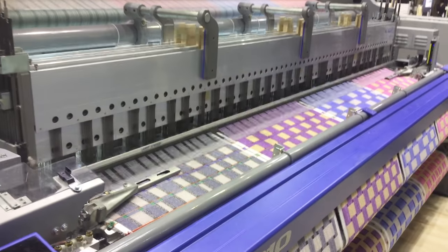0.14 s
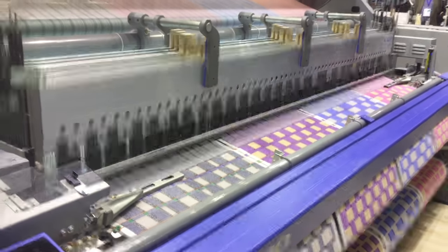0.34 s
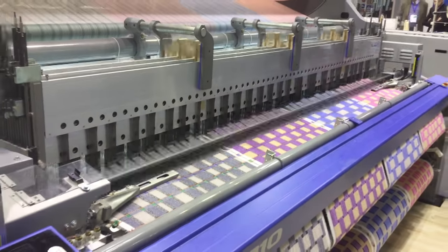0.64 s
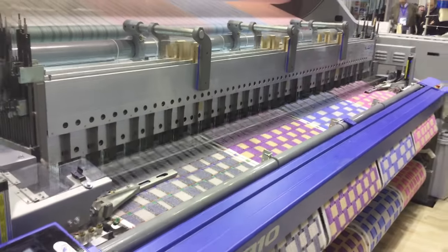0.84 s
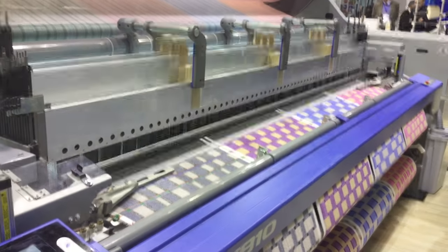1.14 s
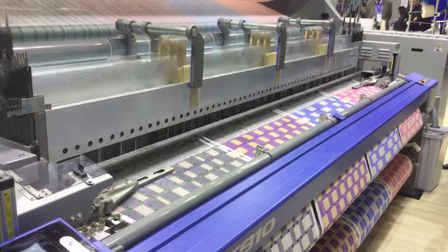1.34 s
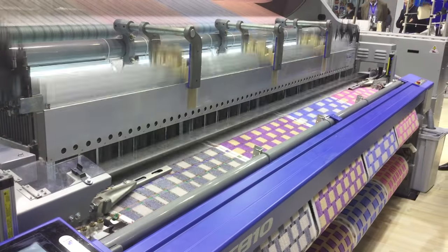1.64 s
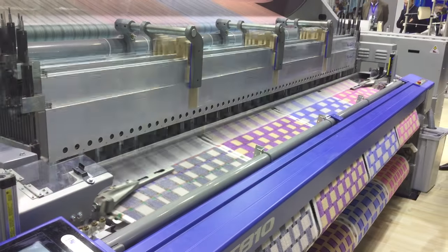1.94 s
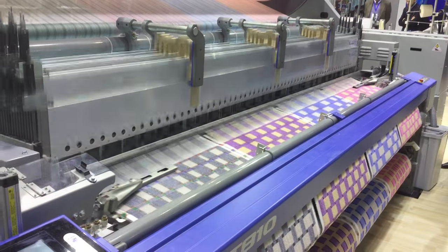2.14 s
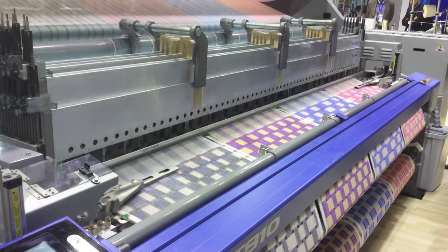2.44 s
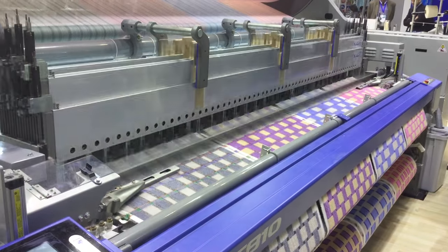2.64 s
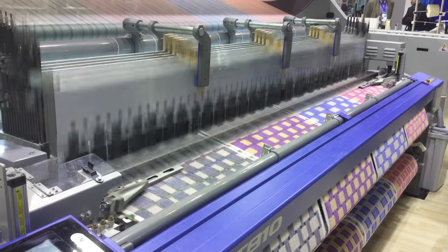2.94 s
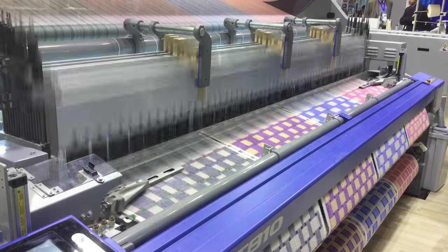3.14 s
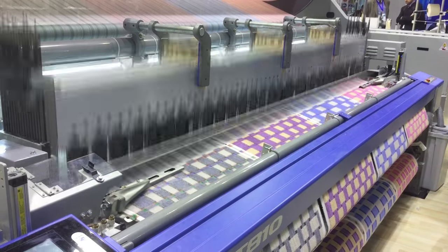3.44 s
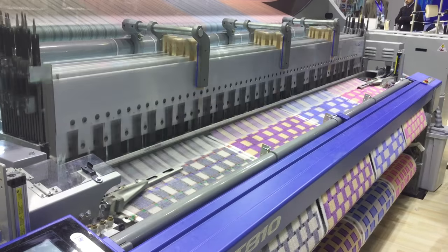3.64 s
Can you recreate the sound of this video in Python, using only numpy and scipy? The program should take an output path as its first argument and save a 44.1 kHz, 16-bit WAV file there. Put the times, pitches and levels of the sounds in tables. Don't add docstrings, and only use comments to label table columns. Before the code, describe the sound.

Air-jet weaving loom pounding in hissing, thudding bursts, first slower, then pausing, then running fast

```python
import sys
import numpy as np
from scipy import signal
from scipy.io import wavfile
from scipy.ndimage import uniform_filter1d

SR = 44100
rng = np.random.default_rng(int(sys.argv[2]) if len(sys.argv) > 2 else 0)


def transcribe(signal):
    frames = np.atleast_2d(signal).T
    limited = np.clip(frames, -1, 1)
    pcm = np.round(limited * 32767).astype(np.int16)
    wavfile.write(sys.argv[1], SR, pcm)


def natural_amplitude(level_db):
    exponent = np.asarray(level_db, float) / 20
    return 10 ** exponent


N = 167580

# valve opens in seconds, open for in seconds, hiss in dB, buffeting in dB.
SLOW_PICKS = [(-0.038, 0.071, -18, -7), (0.056, 0.064, -17.5, -9), (0.15, 0.058, -17.0, -10),
              (0.24, 0.06, -17, -11.5), (0.333, 0.058, -17, -12.5), (0.426, 0.057, -17.7, -12),
              (0.517, 0.052, -17.5, -11.5), (0.606, 0.062, -18.5, -12.5), (0.697, 0.064, -17, -11),
              (0.791, 0.055, -16.5, -9.5), (0.882, 0.06, -17.8, -10), (0.974, 0.061, -18, -12.5),
              (1.064, 0.065, -16.5, -9), (1.155, 0.073, -18.5, -14), (1.429, 0.07, -15.6, -11.5),
              (1.704, 0.069, -16, -11.5), (1.801, 0.048, -16, -7.5)]
# valve opens in seconds, open for in seconds, hiss in dB, buffeting in dB.
FAST_PICKS = [(1.888, 0.051, -17.5, -11), (1.964, 0.043, -18, -10.8), (2.036, 0.047, -16, -11),
              (2.111, 0.054, -18.5, -11), (2.184, 0.057, -18.5, -10), (2.259, 0.047, -17.8, -11),
              (2.335, 0.047, -16.5, -6.5), (2.408, 0.053, -18, -12), (2.485, 0.043, -16.6, -11.5),
              (2.558, 0.057, -18, -12.5), (2.633, 0.041, -17.5, -9.5), (2.707, 0.046, -17.5, -11.0),
              (2.783, 0.05, -17.0, -10.5), (2.858, 0.045, -17, -8.9), (2.93, 0.05, -18.5, -10.5),
              (3.005, 0.056, -18.5, -12.5), (3.081, 0.05, -18.0, -10.4), (3.154, 0.051, -18.5, -10),
              (3.228, 0.043, -18, -11), (3.303, 0.05, -18.5, -10.6), (3.378, 0.047, -18, -10),
              (3.452, 0.057, -19.5, -12), (3.527, 0.046, -17, -12.5), (3.602, 0.049, -18.5, -11.5),
              (3.676, 0.05, -17, -10.9), (3.75, 0.042, -17, -9)]
# frequency in Hz, density in dB per Hz.
HISS_SPECTRUM = [(300, -8), (700, -3.5), (1400, 0), (2500, -1.5), (4500, -1), (9300, -1.5), (12000, -23),
                 (15100, 12)]
# frequency in Hz, density in dB per Hz.
GUST_SPECTRUM = [(25, -42), (55, -0.5), (100, 1.5), (300, -3.5), (500, -13), (1200, -16.5), (2500, -23),
                 (6000, -41)]
# time in seconds, extra roar in dB.
STREAM_AIM = [
    (0, -9.5),
    (.45, 4.5),
    (.7, 1),
    (.95, -4.5),
    (1.5, -10),
    (1.75, -5),
    (1.9, 4.5),
    (2.4, 1.5),
    (3.0, 3),
    (3.8, 5.5),
]
# lag in seconds, stretch in time as a ratio.
FRONT_PACES = [
    (.0205, 1.35),
    (.0008, 1),
]
# time in seconds, level in dB.
CLATTER_LEVEL = [
    (0, -32),
    (1.2, -42),
    (1.75, -36),
    (1.95, -22.5),
    (3.8, -25),
]
# frequency in Hz, density in dB per Hz.
DRONE_SPECTRUM = [(15, -62), (25, -9), (101, -7), (327, -16), (1770, -22), (2250, -26), (11500, -39),
                  (15100, -47)]
# frequency in Hz, width in Hz, level in dB.
MOTOR_TONES = [(100, 18, -33), (210, 15.4, -28.5), (588, 16, -33.5), (739, 7.2, -42), (1214, 130, -34),
               (1800, 15, -74)]

PACES = (SLOW_PICKS, FAST_PICKS)


def rms_one(x):
    return x / np.sqrt(np.mean(x ** 2) + 1e-20)


def drift(rate_hz):
    step = 40
    r = np.exp(-2 * np.pi * rate_hz * step / SR)
    slow = signal.lfilter([1], [1, -2 * r, r * r], rng.standard_normal(N // step + 2002))
    slow = rms_one(slow[2000:])
    return np.interp(np.arange(N) / step, np.arange(len(slow)), slow)


def over_time(table):
    return np.interp(np.arange(N) / SR, *np.transpose(table))


def butter_pass(x, order, hz, kind):
    return signal.sosfilt(signal.butter(order, hz, kind, fs=SR, output="sos"), x)


def resonance(x, hz, width_hz):
    r = np.exp(-np.pi * width_hz / SR)
    zeros = np.array([1, 0, -1]) * (1 - r * r) / 2
    poles = [1, -2 * r * np.cos(2 * np.pi * hz / SR), r * r]
    return signal.lfilter(zeros, poles, x)


def colour(sources, spectrum, patchy_db, patch_hz):
    edges = 22 * 2 ** np.arange(0, 10, .5)
    hz, db = np.transpose(spectrum)
    out = 0
    for k, (low, high) in enumerate(zip(edges[:-1], edges[1:])):
        band = butter_pass(sources[k % 2], 2, [low, high], "band")
        level = np.interp(np.log(low * high) / 2, np.log(hz), db)
        out = out + natural_amplitude(level + patchy_db * drift(patch_hz)) * band
    return rms_one(out)


def valve(column, lag, opening, closing, lead_db, shapes):
    lead_times = 0.0067, 0.032
    after_times = 0.041, 0.02
    t = np.arange(N) / SR
    out = np.zeros(N)
    for rows, lead_s, after_s, shape in zip(PACES, lead_times, after_times, shapes):
        peak_at, swell_db, after_db = shape
        for row in rows:
            start, length = row[:2]
            i = slice(max(0, int((start - .03) * SR)), int((start + length + .08) * SR))
            u = t[i] - start
            lead = natural_amplitude(lead_db) * np.clip(1 + u / lead_s, 0, 1)
            opened = np.clip(np.maximum((u - lag) / opening + .5, lead), 0, 1)
            shut = np.clip((length - u) / closing + .5, 0, 1)
            after = natural_amplitude(after_db) * np.clip((length + after_s - u) / (2 * closing), 0, 1)
            swell = np.interp(u / length, [0, peak_at, 1], [-swell_db, 0, -swell_db])
            flow = np.maximum(shut * natural_amplitude(swell + swell_db / 2), after)
            out[i] = np.maximum(out[i], opened * natural_amplitude(row[column]) * flow)
    return out


def lingering(gain, seconds):
    r = np.exp(-1 / (seconds * SR))
    return signal.lfilter([1 - r], [1, -r], gain ** 2, zi=[np.mean(gain ** 2) * r])[0]


def jet():
    gain = valve(column=2, lag=0, opening=0.01, closing=0.0058, lead_db=-3.5,
                 shapes=[(0.73, 3.5, -12), (0.21, 3.5, -4.5)])
    drain = natural_amplitude(-9) ** 2 * lingering(gain, .012)
    hall_t60_s = .7
    hall = natural_amplitude(-21) ** 2 * lingering(gain, hall_t60_s / np.log(1e6))
    hiss = colour(rng.standard_normal((2, N)), HISS_SPECTRUM, patchy_db=-0.85, patch_hz=40.0)
    hiss = hiss + natural_amplitude(-7) * resonance(hiss, 9450, 800)
    return natural_amplitude(2.15) * np.sqrt(gain ** 2 + drain + hall) * hiss * natural_amplitude(0.64 * drift(40.0))


def buffeting():
    eddies_per_s, spread_db = 900, 3.5
    even_s, even_share = 0.0347, 0.9
    roar_from_hz = 504
    gain = valve(column=3, lag=0.0022, opening=.007, closing=.011, lead_db=-10,
                 shapes=[(0.52, 6, -18), (0.27, 4, -18)])
    size = natural_amplitude(spread_db * np.minimum(rng.exponential(1, (2, N)), 4)) * rng.choice([-1, 1], (2, N))
    bursts = size * (rng.random((2, N)) < eddies_per_s / SR) + 1e-18
    eddies = colour(bursts, GUST_SPECTRUM, patchy_db=2.0, patch_hz=30.0)
    local_power = uniform_filter1d(eddies ** 2, int(even_s * SR))
    eddies = rms_one(eddies / local_power ** (even_share / 2))
    roar = butter_pass(eddies, 2, roar_from_hz, "high")
    body = butter_pass(eddies, 2, roar_from_hz, "low")
    return gain * (body - natural_amplitude(over_time(STREAM_AIM)) * roar)


def front():
    swing_hz, sag_s, rise_s, die_s = 128, .027, .004, .016
    levels_db, spread_db = (-7, -1), 2
    out = np.zeros(N + SR)
    for rows, (lag, stretch), db in zip(PACES, FRONT_PACES, levels_db):
        rows = np.array(rows)
        u = np.arange(SR // 8) / SR / stretch
        swing = -np.sin(2 * np.pi * swing_hz * sag_s * (1 - np.exp(-u / sag_s)))
        swing = swing * (1 - np.exp(-u / rise_s)) * np.exp(-u / die_s)
        for row, luck in zip(rows, rng.standard_normal(len(rows))):
            i = int((row[0] + lag) * SR)
            if i > 0:
                level = db + row[3] - rows[:, 3].mean() + spread_db * luck
                out[i:i + len(u)] += natural_amplitude(level) * swing
    return out[:N]


def clatter():
    ticks_per_s, ring_cycles = 700, 8.1
    pitches = np.geomspace(509, 3370, 16)
    ticks = natural_amplitude(2.0 * np.minimum(rng.exponential(1, N), 4)) * (rng.random(N) < ticks_per_s / SR)
    dealt = rng.integers(0, 16, N)
    rings = 0
    for k, hz in enumerate(pitches):
        struck = ticks * (dealt == k) + 1e-18
        rings = rings + resonance(struck, hz, hz / ring_cycles) / np.sqrt(hz)
    return natural_amplitude(over_time(CLATTER_LEVEL)) * rms_one(rings)


def drone():
    throb_hz, throb_db = 16, 3
    white = rng.standard_normal((2, N))
    throb = natural_amplitude(throb_db * np.sin(2 * np.pi * throb_hz * np.arange(N) / SR))
    tones = 0
    for hz, width_hz, db in MOTOR_TONES:
        tones = tones + natural_amplitude(db) * rms_one(resonance(white[0, ::-1], hz, width_hz))
    return natural_amplitude(-20) * throb * colour(white, DRONE_SPECTRUM, patchy_db=0.5, patch_hz=9.5) + tones


def scene():
    airborne = jet() + buffeting() + clatter() + drone()
    return (butter_pass(airborne, 3, 48, "high") + front())[None, :]


def top_cut(x):
    return signal.sosfilt(signal.butter(12, 15220, fs=SR, output="sos"), x)


def record(dry):
    headroom = 1.09
    x = butter_pass(dry, 4, 37, "high")
    x = x / (1 + np.abs(x / headroom) ** 3) ** (1 / 3)
    x = signal.sosfilt(signal.cheby2(20, 60, 15600, fs=SR, output="sos"), x)
    return top_cut(x)


dry = scene()
out = record(dry)
transcribe(out)
```